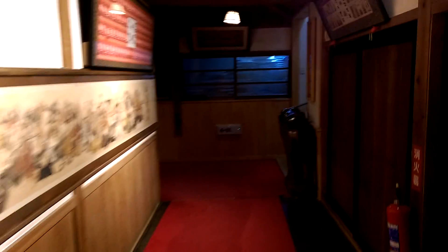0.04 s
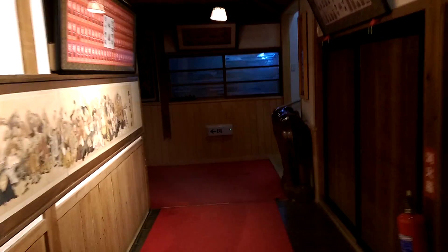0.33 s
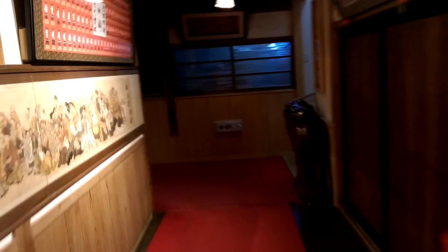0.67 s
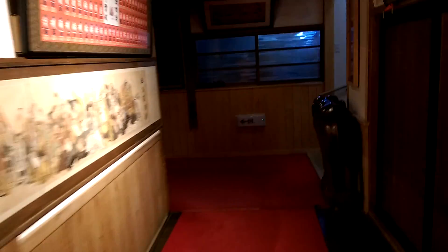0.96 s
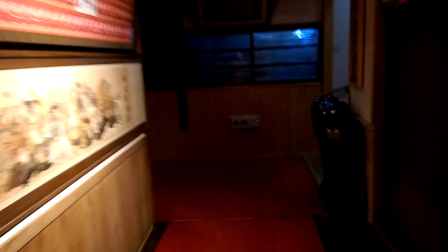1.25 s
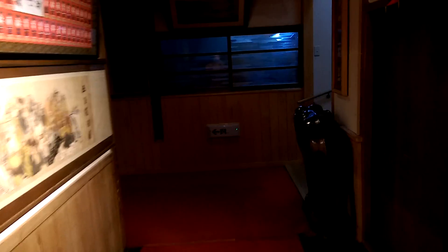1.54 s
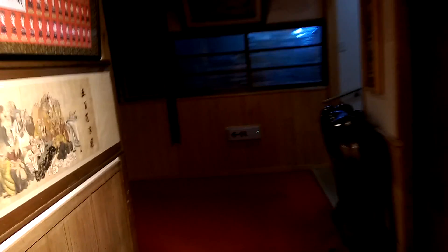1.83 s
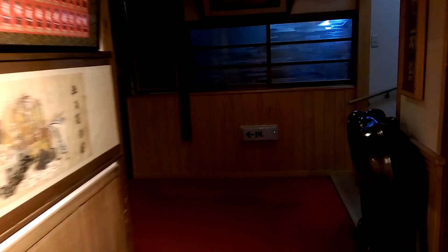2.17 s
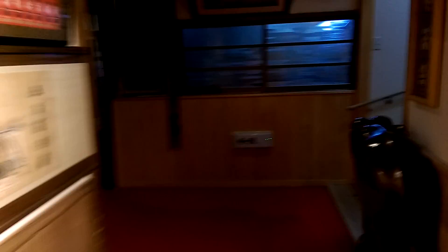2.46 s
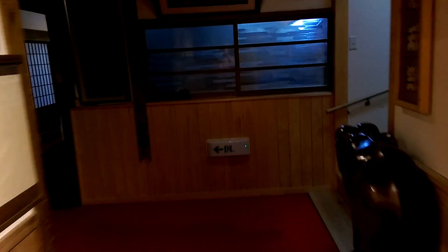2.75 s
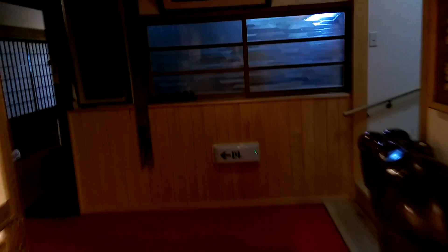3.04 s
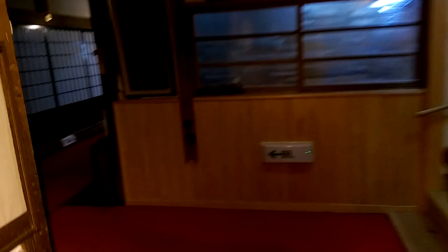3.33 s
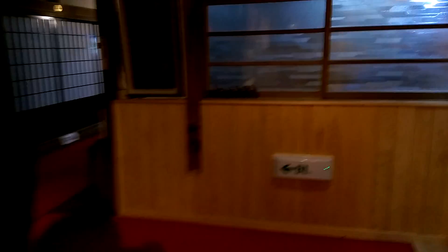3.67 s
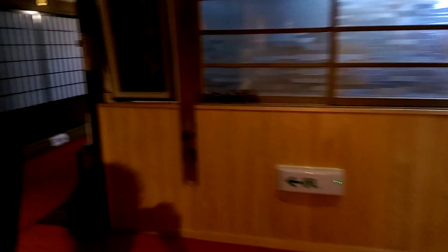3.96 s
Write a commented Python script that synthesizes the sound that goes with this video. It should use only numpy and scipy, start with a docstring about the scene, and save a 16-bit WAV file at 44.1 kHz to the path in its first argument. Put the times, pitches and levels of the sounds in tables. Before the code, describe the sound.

Dull footsteps thud on carpeted wooden boards as someone walks about seven slow steps along a quiet indoor corridor. Soles scuff lightly, boards tick and squeak faintly, and clothes rustle softly over a low hush of air.

```python
"""Dull footsteps thud on carpeted wooden boards: someone walks about seven slow steps in a quiet corridor.
Each landing makes the boards ring and sets the whole floor bouncing on its joists, the beams beneath it.
Soles scuff and slap the carpet, and boards tick and squeak under the shifting weight; these small sounds
echo briefly off the walls. Clothes rustle with each stride over the faint hush of the air."""
import sys
import numpy as np
from scipy import signal
from scipy.fft import rfft, irfft
from scipy.io import wavfile
from scipy.ndimage import uniform_filter1d

SR = 44100
rng = np.random.default_rng(int(sys.argv[2]) if len(sys.argv) > 2 else 0)


def digitize_waveform(pressure):
    """Quantize a signal to 16-bit integers and store it at the path in sys.argv[1].

    Rows of a 2-D input are taken as channels; values are limited to [-1, 1].
    """
    field = np.atleast_2d(pressure).T
    bounded = np.clip(field, -1, 1)
    quanta = np.round(bounded * 32767).astype(np.int16)
    wavfile.write(sys.argv[1], SR, quanta)


N = 176400
TIME = np.arange(N) / SR
AGE = TIME[:SR]  # seconds since a sound began
CONTACT_LIKENESS = 0.11  # scuffs and ticks are mostly different in the two ears

# How alike the air and the rustle are in both ears (1 is identical): pitch_hz, likeness
AIR_LIKENESS = [(60, 0.81), (200, .55), (550, 0.57), (1600, 0), (15000, 0)]
# Which side the air and the rustle lean to: pitch_hz, left_minus_right_db
AIR_BALANCE = [(60, 4), (180, 2.5), (550, 2.5), (1600, -2.5), (5000, 0), (15000, -5)]


def from_db(db):
    """Turn decibels into a number to multiply a sound by."""
    return 10 ** (np.asarray(db) / 20)


def rms_one(x):
    """Scale a signal so that its average power is 1."""
    return x / np.sqrt(np.mean(x ** 2) + 1e-20)


def at_hz(points, hz):
    """Read between the rows of a table, with pitch spaced in octaves."""
    pitches, values = np.transpose(points)
    return np.interp(np.log(hz + 1), np.log(pitches), values)


def pan(db):
    """Left and right gains that make the left louder by db."""
    return from_db(np.array([[.5], [-.5]]) * db)


def add(out, start_s, x):
    """Mix a sound in at its start time."""
    i = max(int(start_s * SR), 0)
    out[:, i:i + x.shape[-1]] += x[..., :N - i]


def wander(size, step_s):
    """A line that drifts to a new random value, typically within 1 of zero, every step."""
    return np.interp(TIME[:size] / step_s, np.arange(size), rng.standard_normal(size))


def noise(spectrum, likeness, size, tilt_db=0, balance=None):
    """Stereo noise of power 1; the spectrum says how strong each pitch is next to the others."""
    hz = np.arange(size // 2 + 1) * SR / size
    mid, side = rfft(rng.standard_normal((2, size)))
    alike = np.clip(at_hz(likeness, hz) if np.ndim(likeness) else likeness, -1, 1)
    stereo = np.sqrt(1 + alike) * mid + np.sqrt(1 - alike) * side * [[1], [-1]]
    gain = from_db(at_hz(spectrum, hz) + tilt_db * np.log2(hz + 1))
    gain *= hz ** 2 / (hz ** 2 + (spectrum[0][0] / 2) ** 2)  # fade away below the first row
    if balance:
        gain = gain * pan(at_hz(balance, hz))
    return rms_one(irfft(gain * stereo, size))


def keep_band(x, hz, kind, order=2):
    """Let through the "low" pitches, the "high" ones or a "band" between two."""
    return signal.sosfilt(signal.butter(order, np.clip(hz, 10, 19000), kind, fs=SR, output="sos"), x)


def dying(ring_s):
    """A fade that falls 60 dB in ring_s seconds."""
    return np.exp(-np.log(1000) * AGE / ring_s)


def burst(t, rise_s, decay_s):
    """A straight rise, then a fall to about a third every decay_s."""
    return np.minimum(t / rise_s, 1) * np.exp(-np.maximum(t - rise_s, 0) / decay_s)


def room_tone():
    """The still air of the corridor makes a faint, steady hush."""
    # Tone of the hush: pitch_hz, level_db
    air_spectrum = [(20, -5), (45, -2), (100, -0.5), (190, -5), (400, -7), (800, -12.5), (1500, -13),
                    (3000, -14), (5000, -20), (9000, -22), (15500, -26)]
    return from_db(-64) * noise(air_spectrum, AIR_LIKENESS, N, balance=AIR_BALANCE)


def corridor_echo(x):
    """Reflections from the panelled walls blur into a short echo; the middle pitches last longest."""
    # How long the echo lasts: pitch_hz, ring_s
    echo_times = [(300, 0.23), (1200, 0.38), (2500, 0.37), (5000, 0.21), (9000, 0.33), (15000, 0.24)]
    # Tone of the echo: pitch_hz, level_db
    echo_levels = [(300, -0.5), (2500, 4.5), (6000, 0.5), (15000, 2.5)]
    white = rng.standard_normal((2, 2, SR))
    octaves_hz = 125 * 2 ** np.arange(8)
    tail = 0
    for k, (low, high) in enumerate(zip(octaves_hz, octaves_hz[1:])):
        hz = np.sqrt(low * high)
        band = keep_band(white[k % 2], [low, high], "band")
        tail = tail + band * from_db(at_hz(echo_levels, hz)) * dying(at_hz(echo_times, hz))
    tail *= np.clip(AGE / 0.0039 - 1, 0, 1)  # a short gap before the first reflection
    tail /= np.sqrt(np.sum(tail ** 2))
    blended = 1.03 * x + 0.18 * x[::-1]  # each side spills into the other
    return from_db(-3) * signal.fftconvolve(blended, tail, axes=1)[:, :N]


def rustle():
    """Clothes and soles rub in a soft swell with each stride."""
    # One swell per stride: peak_s, level_db
    strides = [(0.17, -61.5), (0.85, -60.5), (1.422, -60), (2.12, -59), (2.65, -63), (3.419, -59.5),
               (3.95, -61.5)]
    # Tone of rubbing cloth: pitch_hz, level_db
    cloth_spectrum = [(50, 7.5), (170, 15.5), (400, 5), (700, 2.5), (1400, -2), (2600, 0.5), (4500, -5.5),
                      (9000, -12.5), (15000, -12)]
    width_s = 0.16
    swells = sum(from_db(db) * np.exp(-.5 * ((TIME - peak_s) / width_s) ** 2) for peak_s, db in strides)
    flutter = from_db(3.4 * wander(N, step_s=.025) + 1.7 * wander(N, step_s=0.00091))
    return swells * flutter * noise(cloth_spectrum, AIR_LIKENESS, N, balance=AIR_BALANCE)


def board_squeaks():
    """Boards stick and slip against each other, making a thin, unsteady tone with one overtone."""
    # Each squeak: start_s, rise_s, decay_s, pitch_hz, level_db, overtone_db, wobble (share of the pitch)
    squeaks = [(0.131, .012, .005, 6470, -57.5, -26, .005), (0.139, 0.011, 0.01, 3265, -42.5, -34, 0.039),
               (0.179, .015, 0.014, 3235, -52, -32, .022), (2.011, 0.0062, 0.009, 9140, -60.5, -30, .004),
               (2.515, 0.0059, 0.009, 5950, -57, -28, .007), (2.59, 0.0027, .008, 5500, -52.5, -32, 0.07),
               (3.343, 0.02, 0.026, 4125, -50.5, -17, 0.017), (3.354, 0.025, 0.013, 2060, -51, -14, 0.096),
               (3.36, .012, .006, 6020, -59, -26, .005), (3.411, 0.03, 0.017, 4133, -54, -27, 0.019),
               (3.587, .02, .012, 6840, -67, -30, .004)]
    out, size = np.zeros((2, N)), SR // 2
    rasp_db = 4
    flat_start = 0.056 * np.exp(-AGE[:size] / 0.0057)  # the pitch starts low and quickly settles
    for start_s, rise_s, decay_s, hz, db, overtone_db, wobble in squeaks:
        pitch_hz = hz * (1 - flat_start + wobble * wander(size, step_s=.0005))
        phase = 2 * np.pi * np.cumsum(pitch_hz) / SR
        tone = np.sin(phase) + from_db(overtone_db) * np.sin(2 * phase)
        rasp = rms_one(from_db(rasp_db * wander(size, step_s=0.00198)))  # the wood catches and lets go
        add(out, start_s, from_db(db) * rasp * burst(AGE[:size], rise_s, decay_s) * tone)
    return out * pan(db=-10)


def joint_ticks():
    """A joint between boards slips in a short run of dry ticks."""
    # Each slip: start_s, level_db
    slips = [(1.988, -55), (2.014, -56), (2.061, -57.5), (2.107, -53), (2.15, -52), (2.18, -54),
             (2.238, -144)]
    # Tone of a tick: pitch_hz, level_db
    tick_spectrum = [(1000, -37), (2000, -3), (2900, 5), (4000, -23), (7000, -27), (8600, -11),
                     (11000, -23), (15000, -38)]
    out, size = np.zeros((2, N)), SR // 10
    decay_s = 0.0056
    fade = np.exp(-AGE[:size] / decay_s)
    for start_s, db in slips:
        add(out, start_s, from_db(db) * fade * noise(tick_spectrum, CONTACT_LIKENESS, size))
    return out * pan(db=-10.5)


def sole_scuffs():
    """A sole brushes or slaps the carpet in a short burst of grainy noise."""
    # Each touch: start_s, level_db, rise_s, decay_s, tilt_db_per_octave, left_minus_right_db
    touches = [(0.02, -59, 0.0084, 0.059, 1, -3), (0.069, -50, 0.0015, 0.06, -2.5, -6),
               (0.712, -54, 0.0063, 0.048, 1.7, -5.5), (0.969, -62, 0.013, 0.057, 0, -6),
               (1.245, -52, 0.012, 0.036, .5, -3), (1.366, -48, 0.0023, 0.01, -2.5, 2),
               (1.392, -55.5, 0.0031, 0.026, 2, -9), (1.805, -54, 0.0013, 0.033, 2, -2),
               (1.877, -44.5, 0.0029, 0.015, 1.1, -6), (1.98, -57, .02, 0.053, -2, -1),
               (2.42, -57.5, 0.0093, 0.031, -1.5, -2), (2.499, -55.5, 0.0035, 0.062, -0.5, -2),
               (2.588, -47, 0.011, 0.016, 1, -5), (3.125, -51.5, 0.0014, 0.066, -0.5, -3.5),
               (3.485, -61.5, 0.0045, 0.0081, -4, -6), (3.763, -44, 0.00033, 0.0097, -3, -6),
               (3.798, -55.5, 0.019, 0.046, 1.5, -10), (3.847, -31, 0.0013, 0.003, 0, -2),
               (3.854, -36, 0.0067, 0.011, -.5, -8)]
    # Tone of a sole on carpet: pitch_hz, level_db
    sole_spectrum = [(150, -26), (400, 1), (800, 2.5), (1400, -4.5), (2400, -1.5), (3500, -8),
                     (5500, -13.5), (9000, -20), (12500, -22), (15500, -29)]
    out, size = np.zeros((2, N)), SR // 2
    grain_db = 3.5
    for start_s, db, rise_s, decay_s, tilt_db, pan_db in touches:
        grain = rms_one(from_db(grain_db * wander(size, step_s=.0006)))
        rub = grain * noise(sole_spectrum, CONTACT_LIKENESS, size, tilt_db)
        add(out, start_s, from_db(db) * pan(pan_db) * burst(AGE[:size], rise_s, decay_s) * rub)
    return out


def floor_bounce():
    """The whole floor swings on its joists under each step, making a very deep note."""
    # Each bounce: start_s, level_db
    bounces = [(0.021, -37.5), (0.657, -40), (1.249, -39), (1.89, -42.5), (2.511, -45), (3.14, -41),
               (3.764, -46)]
    pitch_hz, ring_s, rise_s = 27.04, 0.88, 0.0048
    swing = np.sin(2 * np.pi * pitch_hz * AGE) * dying(ring_s) * (1 - np.exp(-AGE / rise_s))
    out = np.zeros((2, N))
    for start_s, db in bounces:
        add(out, start_s, from_db(db) * swing)
    return out * pan(db=3.7)


def footstep_thuds():
    """Each landing rings the board underfoot and the floor around it, with its own loudness and dullness."""
    # Weight landing: start_s, level_db, top_hz, bottom_hz, ring_s, underfoot_hz, underfoot_db
    landings = [(0.017, -29, 533, 90, 0.31, 275, -2.5), (0.058, -37, 288, 43, 0.21, 183.5, 10.5),
                (0.106, -52.5, 222, 45, 0.23, 181, 9), (0.635, -55, 296, 60, 0.86, 185.8, -2),
                (0.723, -53.5, 760, 98, 0.42, 149, -5), (0.885, -65, 273, 100, 1, 203.6, 5.5),
                (1.24, -39.5, 216, 46, 0.29, 118.6, 3.5), (1.354, -42.5, 220, 78, 0.31, 139.2, 0.5),
                (1.793, -56.5, 355, 99, 0.9, 217, -3), (1.878, -35, 850, 54, 0.36, 198.2, -1),
                (2.1, -51.5, 101, 45, 0.12, 79.4, 8.5), (2.503, -55.5, 477, 55, 0.79, 126.7, 1.5),
                (2.98, -60.5, 377, 148, 0.35, 287, 1), (3.134, -32, 425, 90, 0.26, 271, -3),
                (3.156, -36.5, 189, 35, .27, 146, 10), (3.461, -57, 650, 125, 0.48, 138.6, 3),
                (3.745, -43.5, 200, 60, 0.3, 124, 6), (3.766, -28, 530, 89, .22, 264, 0.5),
                (3.849, -37.5, 1080, 214, 0.26, 451, -6)]
    # The notes the boards naturally ring at: pitch_hz, level_db, ring_s
    board_notes = [(46.2, -4, 0.45), (60.24, 0.5, 0.74), (93.2, 0, 0.33), (111.4, -1, 0.1),
                   (147.8, -8, 0.46), (185.5, -4, 0.39), (225, -9, 0.13), (277, -10.5, 0.46),
                   (310.5, -4.5, 0.36), (376.4, -9.5, 0.31), (425, -7.5, 0.5), (482.5, -16, 0.38),
                   (549, -10.5, 0.12), (593, -11.5, .3), (665, -6, 0.36), (692, 1.5, 0.3), (766, -6, 0.5)]
    # The rest of the floor, its notes so close that they blur into noise: pitch_hz, level_db
    floor_spectrum = [(30, -14), (70, -2), (150, -2.5), (270, -1.5), (450, -5), (700, -8), (1100, -2.5),
                      (2000, -8.5), (5000, -38)]
    # How alike that noise is in both ears: pitch_hz, likeness
    floor_likeness = [(60, 0.84), (200, 0.92), (500, 0.78), (1000, 0.77), (2000, 0.19)]
    notes_db, scatter_db = -2, 1.5
    steady_s, treble_hz, treble_decay_s = 0.017, 895, 0.074
    note_hz, note_db, note_ring_s = np.transpose(board_notes)
    notes = np.array([(-1) ** k * np.sin(2 * np.pi * hz * AGE) * dying(note_ring_s[k])
                      for k, hz in enumerate(note_hz)])
    strengths = from_db(note_db) / np.sqrt(np.sum(from_db(note_db) ** 2) / 2)
    boom_fade = from_db(-22.5) * dying(ring_s=0.94)
    cushion = np.minimum(AGE / 0.0041, 1)  # the carpet spreads the blow over a moment
    out = np.zeros((2, N))
    for start_s, db, top_hz, bottom_hz, ring_s, underfoot_hz, underfoot_db in landings:
        boards = (strengths * from_db(notes_db + scatter_db * rng.standard_normal(len(notes)))) @ notes
        underfoot = from_db(underfoot_db) * np.sin(2 * np.pi * underfoot_hz * AGE) * dying(ring_s)
        floor = noise(floor_spectrum, floor_likeness, SR)
        power = uniform_filter1d(np.mean(floor ** 2, axis=0), int(steady_s * SR))
        floor /= np.sqrt(power + 1e-9)  # even out chance swells
        floor *= from_db(5) * dying(ring_s) + boom_fade
        dull = keep_band(floor, treble_hz, "low", order=1)
        floor = dull + (floor - dull) * np.exp(-AGE / treble_decay_s)  # the treble dies first
        thud = keep_band((underfoot + boards + floor) * cushion, top_hz, "low", order=4)
        add(out, start_s, from_db(db) * keep_band(thud, bottom_hz, "high"))
    return out * pan(db=1)


def scene():
    """Mix the footsteps, the small sounds around them and the still corridor."""
    contacts = sole_scuffs() + joint_ticks()
    squeaks = board_squeaks()
    air = room_tone()
    steps = footstep_thuds() + floor_bounce()
    echo = corridor_echo(contacts + squeaks)
    return air + echo + rustle() + from_db(-3) * squeaks + contacts + steps


def record(dry):
    """Cut away the very highest treble steeply."""
    cutoff_hz = 15720
    return signal.sosfilt(signal.ellip(12, .1, 70, cutoff_hz, fs=SR, output="sos"), dry)


dry = scene()
out = record(dry)
digitize_waveform(out)
```